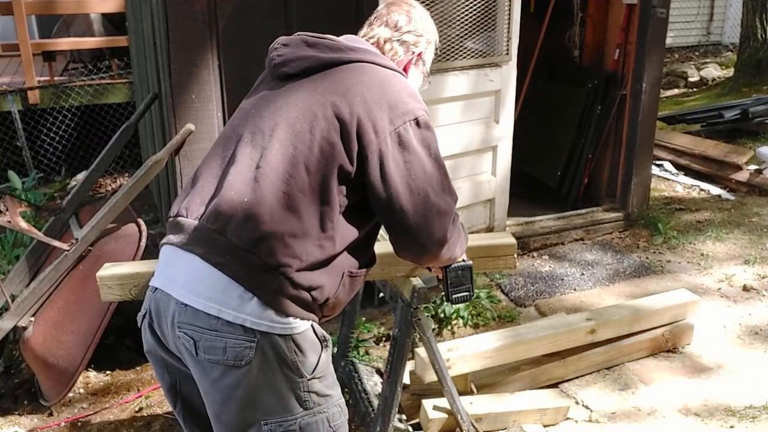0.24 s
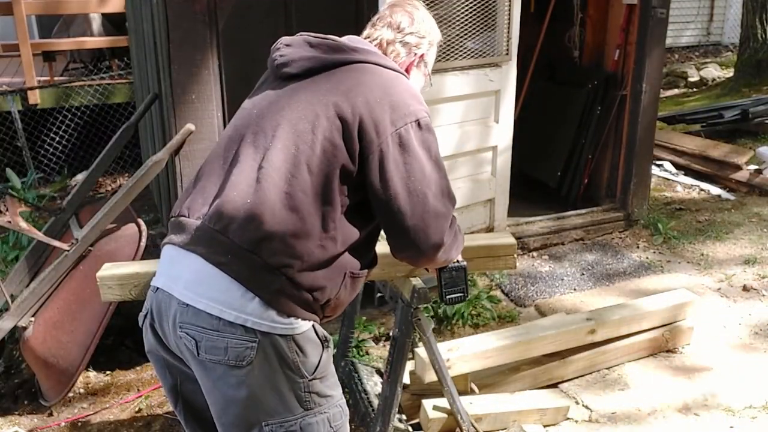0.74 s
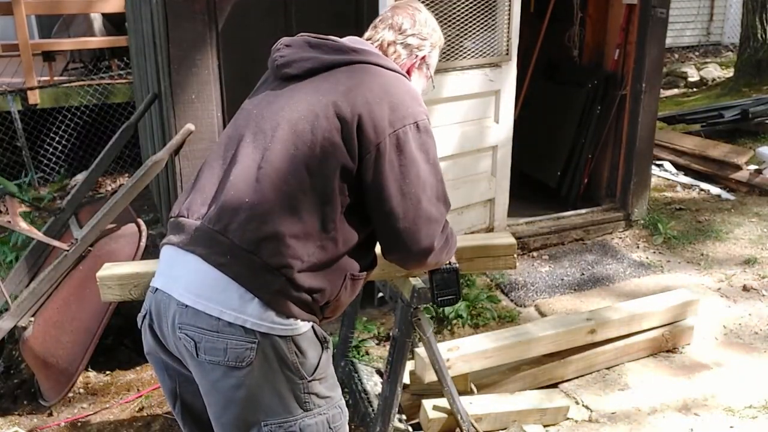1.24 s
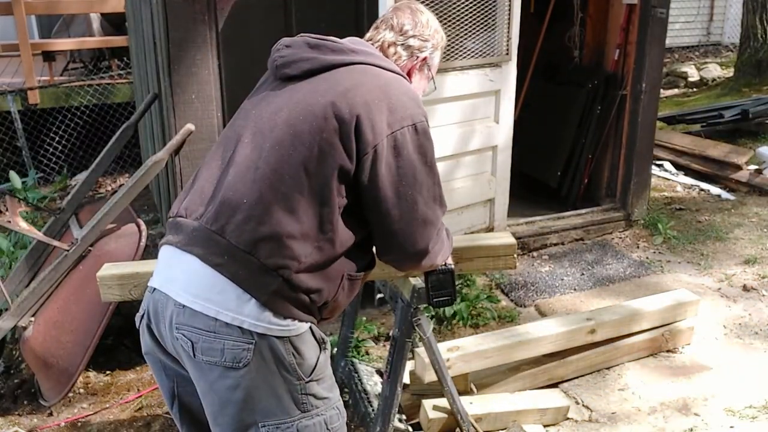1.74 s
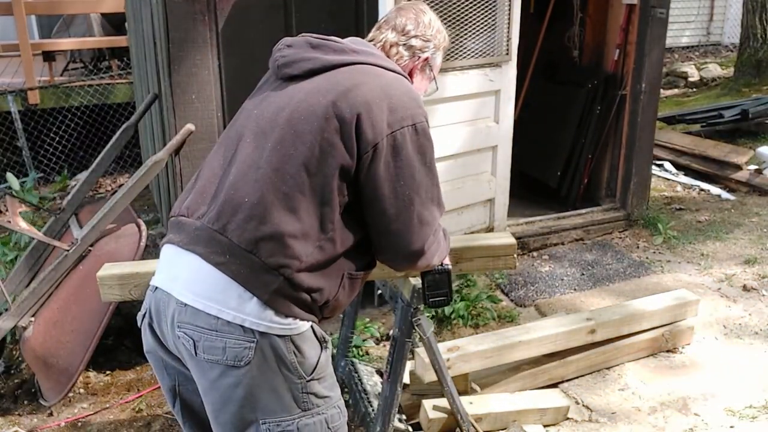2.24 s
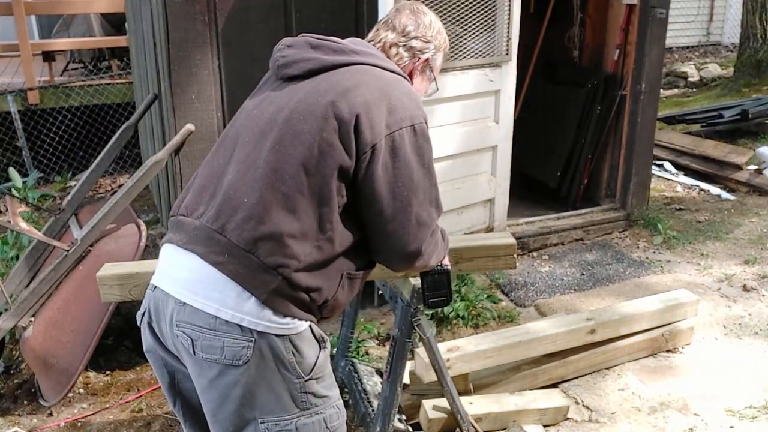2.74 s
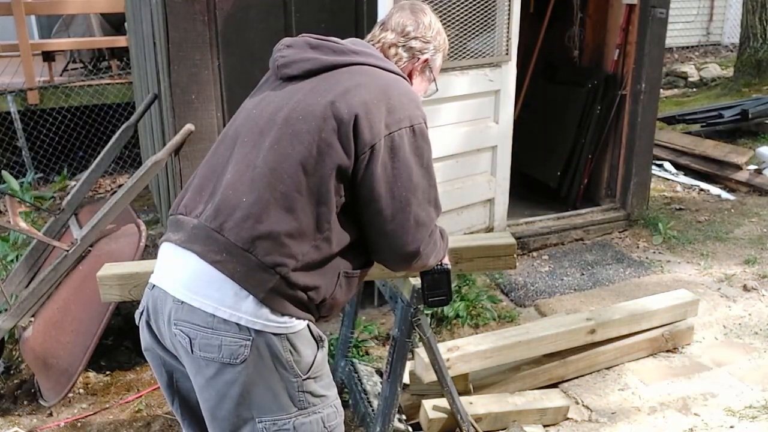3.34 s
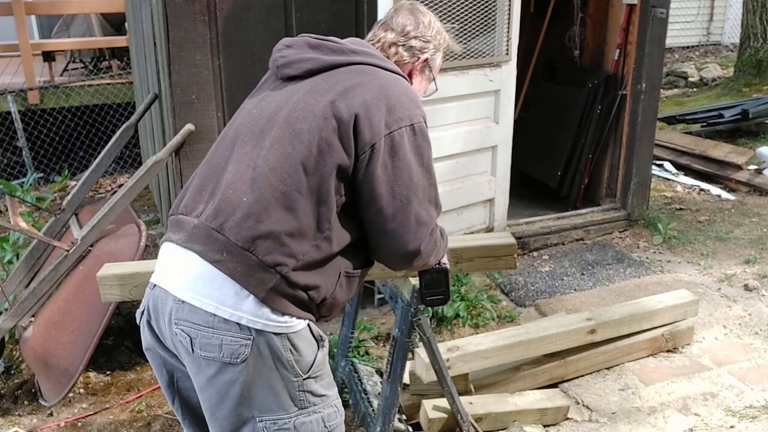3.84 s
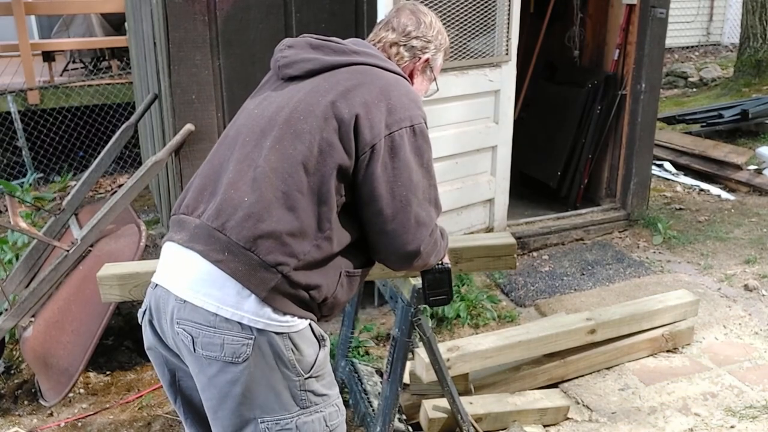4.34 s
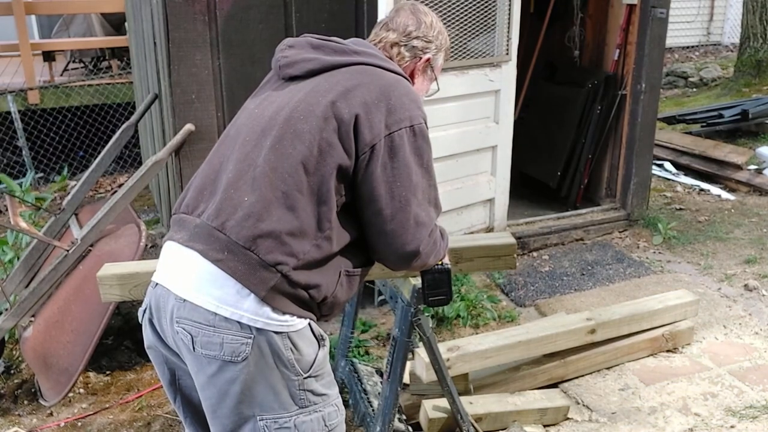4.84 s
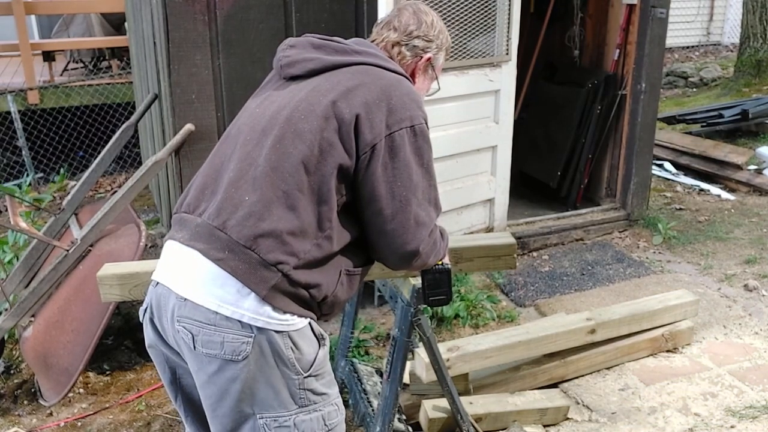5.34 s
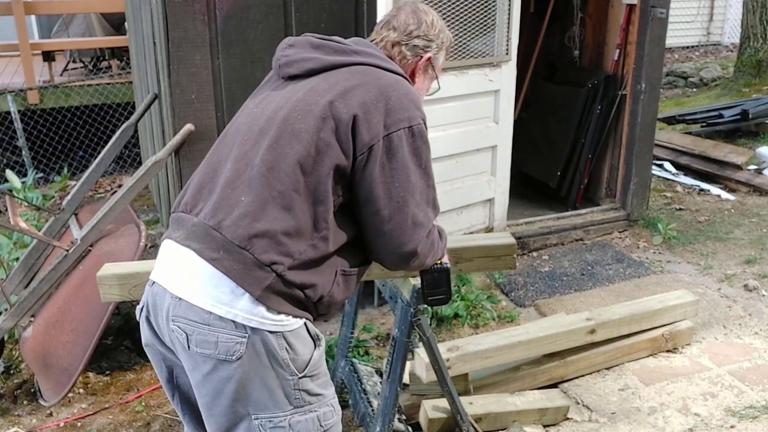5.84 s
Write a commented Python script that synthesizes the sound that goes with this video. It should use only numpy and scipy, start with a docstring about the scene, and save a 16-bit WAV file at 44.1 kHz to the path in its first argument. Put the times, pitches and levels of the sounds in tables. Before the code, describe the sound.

From the first moment an oscillating multi-tool is already running, cutting a wooden post in an open yard. Its rapid strokes make a continuous low-to-mid drone with a bright, nasal buzz, a grainy rasp of tearing fibres and a faint high hiss. From 0 to about 4 seconds the pitch wavers slightly; the bite swells and thins, and short blade skips chatter in the wood, clustered near 1 and 3 seconds. Wind rumbles low on the microphone in irregular gusts. At about 4.2 seconds a faint wind pop comes, then a much stronger one at 4.3; the tool dips abruptly and stays quieter. From 4.5 the motor labours, sagging lowest around 5.3 to 5.8, smoother and more tonal, with a brighter buzz near 5.6. Strong gusts thump from 5.6 to 5.9 as the pitch jumps back up, still running at the end near 6.1.

```python
"""In a yard, an oscillating multi-tool saws into a wooden post, about 300 blade strokes a second.
The post radiates low harmonics of the stroke and chatters through resonances when the blade bounces;
the teeth buzz as banks of higher harmonics and rasp as noise gated by each stroke.
Deep in the cut the motor sags and the sound turns cleaner, then the load eases.
Wind buffets the microphone as low, coloured noise with two pops; the tool is quieter after the second."""
import sys
import numpy as np
from scipy.fft import rfft, irfft, next_fast_len
from scipy.io import wavfile
from scipy.ndimage import uniform_filter1d, minimum_filter1d, map_coordinates

SR = 44100
rng = np.random.default_rng(int(sys.argv[2]) if len(sys.argv) > 2 else 0)


def store_wav(level_fs):
    """Save 16-bit WAV to argv[1]."""
    pcm = np.round(np.clip(np.atleast_2d(level_fs), -1, 1) * 32767)
    wavfile.write(sys.argv[1], SR, pcm.T.astype(np.int16))


N = 269341


def amp(db):
    """Decibel law: 20 dB is a tenfold amplitude."""
    return 10 ** (np.asarray(db) / 20)


def unit(x):
    """Normalisation: scale to rms 1."""
    return x / np.sqrt(np.mean(x ** 2) + 1e-20)


def along(points, hz):
    """Spectral envelope: levels interpolated along a logarithmic frequency axis."""
    point_hz, level_db = np.transpose(points)
    return np.interp(np.log(hz + 1), np.log(point_hz + 1), level_db)


def curves(rows):
    """Piecewise-linear control: one value per sample for each column after the time."""
    times_s, *columns = np.transpose(rows)
    t = np.arange(N) / SR
    return [np.interp(t, times_s, column) for column in columns]


def wobble(knots_per_s, size=2048, count=32):
    """Band-limited random modulation: a smooth curve through random knots."""
    coarse = np.arange(0, N + count, count)
    knots = rng.standard_normal(size)
    values = map_coordinates(knots, [coarse * knots_per_s / SR], mode="wrap")
    return np.interp(np.arange(N), coarse, values)


def filtered(x, response):
    """Linear filtering: the spectrum multiplied by a complex response of frequency."""
    m = next_fast_len(N + SR // 4)
    hz = np.fft.rfftfreq(m, 1 / SR)
    return irfft(rfft(x, m) * response(hz), m)[:N]


def coloured(x, spectrum):
    """Spectral shaping: x weighted by a spectrum, at rms 1."""
    return unit(filtered(x, lambda hz: amp(along(spectrum, hz))))


def resonate(x, modes):
    """Modal response: x through parallel damped resonances of alternating sign, at rms 1."""
    def response(hz):
        total = 0
        for k, (centre_hz, width_hz, level_db) in enumerate(modes):
            damping = 1j * hz * width_hz
            total = total + (-1) ** k * amp(level_db) * damping / (centre_hz ** 2 - hz ** 2 + damping)
        return total

    return unit(filtered(x, response))


def harmonic(turns, order, lag=0):
    """Fourier component: one sinusoidal overtone of the stroke, at rms 1; lag in radians."""
    cycles = order * turns
    phase = (cycles - np.floor(cycles)).astype(np.float32)  # only the fraction of a cycle matters
    return np.sqrt(2) * np.sin(2 * np.pi * phase + lag)


# how hard and how crisply the teeth bite, before trims and modulation:
# start_s, buzz_level_db, finest_overtones_level_db
CUT = [(0.0, -23, -41), (0.17, -17.5, -39), (0.22, -11, -31), (0.58, -20.5, -43), (0.71, -16, -33),
       (0.92, -14, -39), (1.0, -19.5, -40), (1.5, -13, -30.5), (1.58, -17.5, -39.5), (1.99, -13.5, -31.5),
       (2.09, -18, -36.5), (2.4, -13, -29), (2.67, -21, -45), (2.7, -17.5, -31), (2.84, -27, -51),
       (3.04, -21, -42), (3.21, -26, -50), (3.28, -17, -39), (3.71, -19, -40), (4.03, -18.5, -39),
       (4.39, -28, -45), (4.76, -18, -35), (5.24, -27, -36), (5.6, -14, -24.5), (5.99, -27, -45),
       (6.11, -20, -52)]
CRUISE_HZ, USUAL_BITE_DB = 298.6, -17  # stroke rate and buzz level in an ordinary cut


def driven(law, speed_hz):
    """Load dependence: a part's level in dB follows the bite and the motor's sag."""
    usual_db, per_bite, per_sag = law
    bite_db = curves(CUT)[0]
    return usual_db + per_bite * (bite_db - USUAL_BITE_DB) + per_sag * (CRUISE_HZ - speed_hz)


# the housing's low hum, before trim and flutter: start_s, harmonic_1_level_db, harmonic_2_level_db
HUM = [(0.0, -52, -42), (0.47, -53, -37), (0.83, -37.5, -29), (0.92, -47.5, -44.5), (1.29, -48.5, -36.5),
       (3.77, -44.5, -40.5), (3.93, -36.5, -32), (5.02, -34.5, -40), (5.53, -20.5, -32.5), (5.7, -21, -42),
       (6.02, -53, -29), (6.11, -38.5, -29)]
# the housing's 4th harmonic follows the bite: ordinary_level_db, slope_db_per_db_of_bite, slope_db_per_hz_of_sag
WHINE_LAW = (-21.5, 0.52, -0.021)
HUM_TRIM_DB = 1


def housing(turns, speed_hz, flutter_db):
    """Forced vibration: the swinging drive shakes the body into a clean hum and a bite-driven whine."""
    levels_db = [db + HUM_TRIM_DB for db in curves(HUM)]
    levels_db.append(driven(WHINE_LAW, speed_hz))
    out = np.zeros(N)
    for order, db in zip((1, 2, 4), levels_db):
        out += amp(db + flutter_db * wobble(22.11)) * harmonic(turns, order, order)
    return out


# the post driven by the blade, before trims and modulation:
# start_s, low_note_level_db, upper_ring_level_db, ring_centre_hz
POST = [(0.0, -19.5, -23.5, 1770), (0.07, -21, -17.5, 1670), (0.46, -16.5, -14, 1770),
        (0.58, -21.5, -17, 1720), (1.22, -13.5, -10, 1590), (1.61, -16.5, -19.5, 1380),
        (1.9, -18.5, -14, 2190), (2.14, -25.5, -23.5, 1670), (2.5, -25.5, -16, 2090), (2.6, -20, -19, 1460),
        (2.7, -24.5, -13, 1990), (2.81, -30, -20, 1370), (2.87, -25, -33, 1760), (3.15, -18, -14.5, 1510),
        (3.23, -27.5, -29, 1730), (3.37, -16, -12.5, 1640), (3.54, -16, -16, 1470),
        (3.81, -19, -15.5, 1880), (4.27, -40, -26.5, 1520), (4.78, -43, -14.5, 1310),
        (5.17, -30.5, -24, 1560), (5.56, -22.5, -17.5, 1540), (5.85, -31.5, -20.5, 1520),
        (6.11, -21, -32.5, 1980)]
RING_WIDTH_HZ, NOTE_TRIM_DB = 310, 0.5
RING_SKIRT_DB, SKIRT_DB_PER_HZ = -7.5, 1.2  # skirt under the ring, and its fall as the motor sags
RING_SWAP_DB, SWAP_KNOTS_PER_S = 2.5, 7  # the ring's overtones slowly trade strength


def ringing(speed_hz, orders):
    """Resonant weighting: the lowest harmonic is the note, the others share a moving ring; levels in dB."""
    note_db, ring_db, centre_hz = curves(POST)
    off = (np.outer(orders[1:], speed_hz) - centre_hz) / RING_WIDTH_HZ
    skirt_db = RING_SKIRT_DB - SKIRT_DB_PER_HZ * np.maximum(CRUISE_HZ - speed_hz, 0)
    swap_db = [RING_SWAP_DB * wobble(SWAP_KNOTS_PER_S) for _ in off]
    share = (np.exp(-off ** 2) + amp(skirt_db)) * amp(swap_db)
    # only the division of the ring changes, not its total power
    share_db = 20 * np.log10(share / np.linalg.norm(share, axis=0))
    return [note_db + NOTE_TRIM_DB, *(ring_db + share_db)]


def post(turns, speed_hz, rough, flutter_db, sway, lean_db):
    """Radiation of low harmonics: an uneven bite makes the upper ones flutter most."""
    orders = (3, 5, 6, 7)
    bite, lean = wobble(65), wobble(21)
    out = np.zeros(N)
    for order, level_db in zip(orders, ringing(speed_hz, orders)):
        unrest = rough * (order / max(orders)) ** 1.35
        shared_lean_db = lean_db * rough ** 2 * lean
        own_flutter_db = flutter_db * unrest * np.tanh(bite + wobble(45))
        gain = amp(level_db + shared_lean_db + own_flutter_db)
        out += gain * harmonic(turns, order, sway * unrest * wobble(45))
    return out


# blade resonances that weight the low overtones, relative: frequency_hz, level_db
BUZZ = [(2200, 0), (2380, -0.5), (2600, -1.5), (2880, -5.5), (3030, 2), (3230, -6), (3460, 3), (3650, -3.5),
        (3900, 1.5), (4300, -5.5)]
# blade resonances that weight the middle and finest overtones, relative: frequency_hz, level_db
EDGE = [(4300, -0.5), (5000, -0.5), (5600, 1.5), (6050, 0), (6400, 1), (7300, -4), (8000, -6),
        (9000, -12.5), (9700, -13), (10500, -21), (13000, -22), (15800, -28)]


def teeth(turns, speed_hz, rough, orders, spectrum, drift_db, flutter_db, smear, sway, count=48):
    """Source and filter: each stroke's overtones slide across blade resonances and flutter when rough."""
    s = np.arange(0, N, count) / SR
    speed_hz, rough = speed_hz[::count], rough[::count]

    def wander(knots_per_s, size=512):
        """Independent modulation: one smooth random curve per overtone."""
        place = [s * knots_per_s]
        return np.array([map_coordinates(rng.standard_normal(size), place, mode="wrap") for _ in orders])

    def hold(values):
        """Sample and hold: control values repeated up to audio rate."""
        return np.repeat(values.astype(np.float32), count)[:N]

    resonance_db = along(spectrum, np.outer(orders, speed_hz))
    unrest_db = flutter_db * rough * np.tanh(wander(48))
    gains = amp(resonance_db + drift_db * wander(3.607) + unrest_db)
    # the bank keeps an even short-term power
    power = uniform_filter1d(np.sum(gains ** 2, axis=0), size=160)
    gains /= np.sqrt(np.abs(power))
    # the overtones arrive out of step, so each snap is spread over the stroke
    lags = smear * wander(1.116) + sway * rough * wander(34)
    return sum(hold(gain) * harmonic(turns, order, hold(lag)) for order, gain, lag in zip(orders, gains, lags))


# spectrum of tearing fibres, relative: frequency_hz, level_db
RASP = [(300, -7.5), (700, -1), (1500, -26), (2400, -0.5), (3800, 3.5), (4500, 0), (6500, 2.5),
        (7600, -3.5), (8800, -9), (10500, -14.5), (13500, -24), (15800, -38)]


def rasp(turns, depth, grain_db):
    """Amplitude-modulated noise: fibres tear in a burst on every stroke, no two bursts alike."""
    burst = np.exp(depth * np.cos(2 * np.pi * turns))
    grain = amp(grain_db * wobble(330))
    return coloured(burst * grain * rng.standard_normal(N), RASP)


# resonances of post and blade under a bounce, relative: centre_hz, width_hz, level_db
KNOCK = [(900, 147, -0.5), (1570, 510, 5), (1920, 350, 8), (2092, 280, 7.5)]


def chatter(turns, scatter_s, scrape):
    """Impact excitation: one bounce a stroke, random in force and timing, plus scraping noise."""
    starts = np.flatnonzero(np.diff(np.floor(turns)) > 0)
    late, force = rng.standard_normal((2, len(starts)))
    places = np.clip(starts + (late * scatter_s * SR).astype(int), 0, N - 1)
    blows = np.bincount(places, force, N)
    return resonate(unit(blows) + scrape * rng.standard_normal(N), KNOCK)


def hiss(rasp_db):
    """Narrow-band noise: a thin high hiss rises and falls with the rasp."""
    return amp(-30.0 + 0.5 * rasp_db) * resonate(rng.standard_normal(N), [(15300, 200, 0)])


# blade speed under load, before random slip: start_s, stroke_rate_hz
SPEED = [(0.0, 300.5), (0.17, 295.9), (0.31, 299.8), (0.75, 295.5), (1.07, 303.1), (2.41, 296.2),
         (3.11, 306.1), (3.35, 301.4), (3.61, 304.3), (3.96, 295.3), (4.13, 297.4), (4.56, 287.3),
         (4.64, 289.8), (4.9, 287.2), (5.27, 274.8), (5.66, 281.9), (5.78, 276.0), (5.9, 298.5),
         (5.99, 306.5), (6.11, 308.4)]
# skips of the blade in the slot, levels before mixing: centre_s, level_db, length_s
SKIPS = [(0.134, -38.5, 0.015), (0.532, -23, 0.039), (0.863, -40, 0.012), (1.021, -21, 0.013),
         (1.063, -19, 0.013), (1.083, -41, 0.01), (1.15, -25, .014), (1.26, -44, 0.029), (1.74, -21, 0.027),
         (2.207, -23, .02), (2.64, -22.5, 0.017), (2.883, -26, 0.025), (2.973, -21.5, 0.036),
         (3.055, -24, 0.038), (3.124, -24, 0.017), (3.308, -20, .016), (3.483, -33, 0.01),
         (3.704, -24, 0.011), (5.875, -20.5, 0.023)]
# levels that follow bite and sag, before modulation and mixing; each law is
# ordinary_level_db, slope_db_per_db_of_bite, slope_db_per_hz_of_sag
BUZZ_LAW = (-20.5, 0.76, 0.06)
EDGE_LAW = (-22.5, 0.91, 0.053)
RASP_LAW = (-36, 0.14, -0.14)
FIZZ_TRIM_DB = -2  # finest overtones
ROUGH_DB, PINCH_HZ = 17, 300  # how soon tearing roughens contact; stroke rate below which the slot pinches


def multitool(jitter, slip_hz, grab_db):
    """Common periodic excitation: the tonal parts, bursts and bounces share the same strokes."""
    t = np.arange(N) / SR
    speed_hz, = curves(SPEED)
    buzz_db, edge_db, rasp_db = (driven(law, speed_hz) for law in (BUZZ_LAW, EDGE_LAW, RASP_LAW))
    fizz_db = curves(CUT)[1] + FIZZ_TRIM_DB

    # the blade always bounces a little while it tears, and now and then skips
    skips = np.zeros(N)
    for centre_s, level_db, length_s in SKIPS:
        distance = np.minimum(np.abs(t - centre_s) / length_s, 10)
        skips += amp(level_db) * np.exp(-2 * distance ** 2)
    bounce = np.hypot(skips, amp(0.95 * rasp_db - .5))
    bouncy = np.clip(np.sqrt(bounce / amp(-32.0)), 0, 1.2)

    # strong tearing relative to the buzz makes contact less regular
    rough = np.clip(amp(.8 * rasp_db - .35 * buzz_db + ROUGH_DB), .1, 1.1)
    # a slot that pinches the blade slows it and also holds it steady
    pinch = np.clip((PINCH_HZ - speed_hz) / 10, 0, 1)
    rough = rough * (1 - .3 * pinch)

    turns = np.cumsum(speed_hz + slip_hz * rough * wobble(25)) / SR
    contact = turns + jitter * rough * wobble(170)
    # the teeth grab and let go: all their overtones swell together, the finest ones most
    grab = grab_db * (wobble(20) + 1.3 * rough * wobble(80))
    catch = 1.3 * (wobble(24.19) + rough * wobble(75))

    low, mid, high = np.arange(8, 15), np.arange(15, 29), np.arange(29, 55)  # harmonic orders
    buzz = teeth(contact, speed_hz, rough, low, BUZZ, drift_db=1.0, flutter_db=9.5, smear=1.46, sway=0.71)
    edge = teeth(contact, speed_hz, rough, mid, EDGE, drift_db=3.5, flutter_db=9.5, smear=0.87, sway=0.82)
    fizz = teeth(contact, speed_hz, rough, high, EDGE, drift_db=4.5, flutter_db=13, smear=2.5, sway=1.0)
    blade = amp(buzz_db + grab + 2.6) * buzz
    blade += amp(edge_db + grab + .5 * catch + 3.5) * edge
    blade += amp(fizz_db + grab + catch + 3) * fizz

    body = housing(turns, speed_hz, flutter_db=2.5)
    wood = amp(1.5) * post(contact, speed_hz, bouncy, flutter_db=6, sway=1.0, lean_db=1.5)
    tearing = amp(rasp_db + grab - 1.5 * pinch + 10.5) * rasp(turns, depth=0.34, grain_db=3.1)
    bounces = amp(4.0) * bounce * chatter(turns, scatter_s=0.00021, scrape=1.0)
    return body + wood + blade + tearing + bounces + hiss(rasp_db)


# the breeze between the gusts, before quick swings: start_s, level_db
BREEZE = [(0, -21.5), (.45, -25.5), (1, -34.5), (1.4, -28.5), (2.4, -26.5), (3.2, -31), (4.1, -19),
          (5.4, -20), (6.11, -23)]
# gusts on the microphone, before trim and quick swings: start_s, length_s, level_db
GUSTS = [(0, 0.053, -10.5), (0.497, 0.14, -17.5), (0.727, 0.06, -20.5), (1.441, .19, -15),
         (1.712, .03, -18), (2.013, 0.15, -12), (2.237, 0.064, -17.5), (2.38, 0.14, -14), (2.582, 0.4, -12),
         (3.086, 0.074, -14.5), (3.28, 0.6, -15), (3.877, 0.48, -10.5), (4.418, 0.24, -13),
         (4.768, .4, -13), (5.234, 0.11, -14.5), (5.627, .13, -7), (5.84, 0.055, -4), (6.006, .11, -15.5)]
GUST_RISE_S, GUST_FALL_S, GUST_TRIM_DB = .012, .025, -0.5
SWING_DB, SWING_KNOTS_PER_S = 1.6, 12  # quick swings within the wind


def buffeting():
    """Exponential envelopes: gusts rise, hold and fall over a slow breeze; strength in dB."""
    t = np.arange(N) / SR
    gusts = np.zeros(N)
    for start_s, length_s, level_db in GUSTS:
        before = (start_s - t) / GUST_RISE_S
        after = (t - start_s - length_s) / GUST_FALL_S
        outside = np.clip(np.maximum(before, after), 0, 20)
        gusts += amp(level_db + GUST_TRIM_DB) * np.exp(-outside)
    strength = np.hypot(gusts, amp(curves(BREEZE)[0]))
    return 20 * np.log10(strength) + SWING_DB * wobble(SWING_KNOTS_PER_S)


# spectrum of the large eddies, relative: frequency_hz, level_db
RUMBLE = [(15, -17), (32, -14), (52, 2), (80, -2.5), (120, -15), (180, -34.5), (280, -35), (500, -58),
          (1500, -81), (5000, -120)]
# spectrum of the smaller eddies of a hard gust, relative: frequency_hz, level_db
FLAP = [(60, -6), (110, 6.5), (160, 8.5), (230, -9.5), (330, -24.5), (600, -24), (1500, -47), (5000, -120)]


def wind(evenness, growth):
    """Turbulent pressure: eddies slap the microphone port; harder gusts shed smaller, brighter ones."""
    buffet_db = buffeting()
    eddies = coloured(rng.standard_normal(N), RUMBLE)
    # the eddies' own swells are evened out before the gusts shape them
    swell = np.abs(uniform_filter1d(uniform_filter1d(eddies ** 2, size=2200), size=1100))
    rumble = amp(buffet_db) * unit(eddies / (swell + 0.018) ** (evenness / 2))
    flap_db = growth * np.minimum(buffet_db, -10) + 3 * wobble(25)
    flaps = unit(amp(flap_db) * coloured(rng.standard_normal(N), FLAP))
    return rumble + amp(-29.0) * flaps


# wind pops, levels before the push and crackle are scaled: start_s, level_db
POPS = [(4.23, -28), (4.3149, -12)]


def pops(life_s, dull_hz):
    """Decaying pressure pulse: a sudden push of air with a little crackle, softened by a low-pass."""
    t = np.arange(N) / SR
    push = np.zeros(N)
    for start_s, level_db in POPS:
        push += amp(level_db) * (t >= start_s) * np.exp(-np.abs(t - start_s) / life_s)
    crackling_push = push * (1.5 * rng.standard_normal(N) - 2.5)
    return filtered(crackling_push, lambda hz: 1 / (1 + 1j * hz / dull_hz))


# the tool's level drops sharply near the second pop, then partly recovers and stays lower: start_s, level_db
DIP = [(4.304, -2.5), (4.308, 0), (4.32, -17), (4.333, -8)]


def scene():
    """Superposition: tool, wind and pops add in the open air."""
    dip_db, = curves(DIP)
    tool = multitool(jitter=0.0055, slip_hz=.9, grab_db=1.11)
    air = wind(evenness=1.0, growth=2.73) + pops(life_s=0.0027, dull_hz=1290)
    return (tool * amp(dip_db) + air)[None]


TOP_HZ = 15850


def record(dry):
    """Limiting and band limitation: fast gain holds peaks near full scale, then a sharp low-pass."""
    needed = np.minimum(1, .97 / (np.abs(dry[0]) + 1e-9))
    gain = uniform_filter1d(minimum_filter1d(needed, size=200), size=200)
    return filtered(dry[0] * gain, lambda hz: hz < TOP_HZ)[None]


dry = scene()
out = record(dry)
store_wav(out)
```